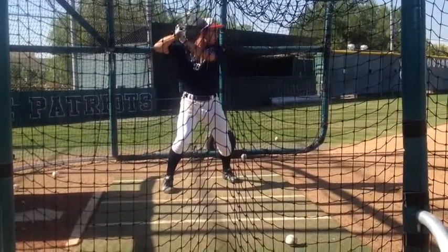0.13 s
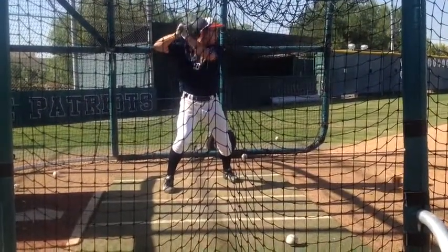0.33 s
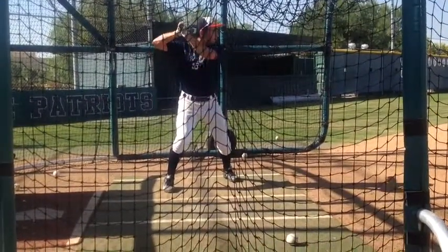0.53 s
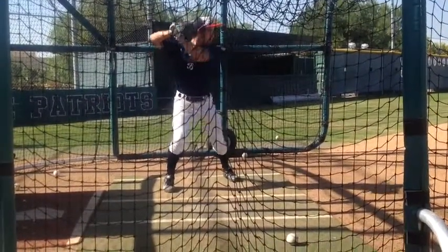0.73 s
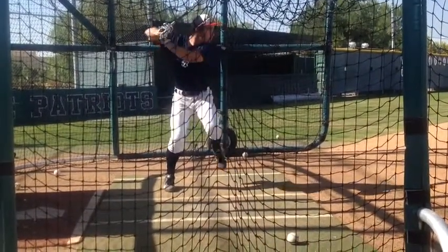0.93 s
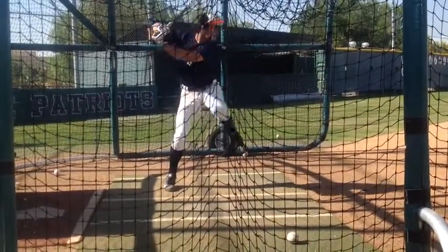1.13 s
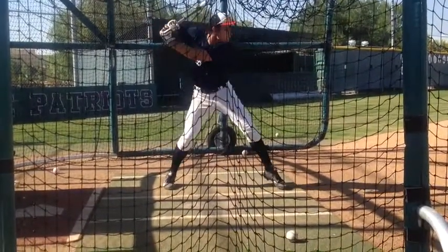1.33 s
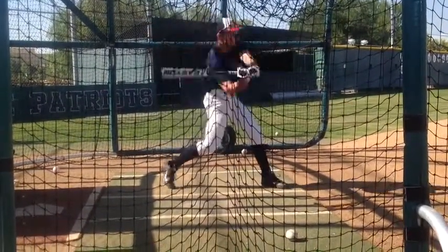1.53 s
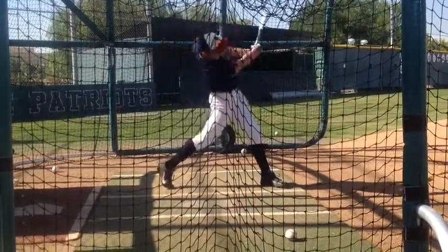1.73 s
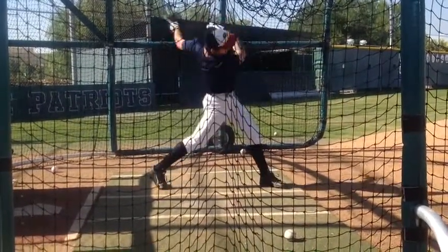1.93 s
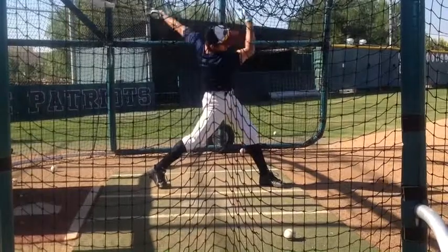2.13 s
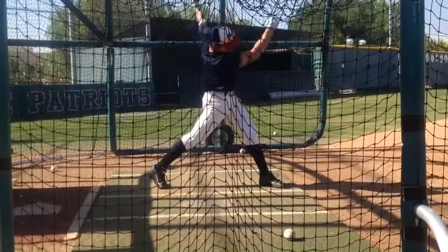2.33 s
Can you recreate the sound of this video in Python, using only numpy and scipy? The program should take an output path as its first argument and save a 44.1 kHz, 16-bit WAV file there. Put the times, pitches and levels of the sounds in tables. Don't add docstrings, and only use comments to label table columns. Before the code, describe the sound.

A metal baseball bat hits a ball with one hard, pinging crack, followed by quick slap echoes and a short ring, in an outdoor batting cage with a faint wavering motor hum; mono microphone nearby, slightly overloaded.

```python
import sys
import numpy as np
from scipy import signal
from scipy.io import wavfile
from scipy.ndimage import uniform_filter1d

SR = 44100
rng = np.random.default_rng(int(sys.argv[2]) if len(sys.argv) > 2 else 0)


def store_wav(level_fs):
    pcm = np.round(np.clip(np.atleast_2d(level_fs), -1, 1) * 32767)
    wavfile.write(sys.argv[1], SR, pcm.T.astype(np.int16))


def attenuation_scalar(level_db):
    decades = np.asarray(level_db, float) / 20
    return 10 ** decades


N = 104958
TIME = np.arange(N) / SR
CRACK_S = 1.6487


def evened(x):
    return x / np.sqrt(np.mean(x ** 2) + 1e-20)


def read(points, hz):
    f, value = np.transpose(points)
    return np.interp(np.log(hz + 1), np.log(f + 1), value)


def add(mix, s, sound):
    part = mix[round(s * SR):][:len(sound)]
    part += sound[:len(part)]


def slow(rate_hz, count):
    f = np.geomspace(rate_hz / 20, rate_hz, 16)
    t = np.linspace(0, N / SR, count)[:, None]
    waves = np.sin(2 * np.pi * (f * t + rng.random(16)))
    return evened((waves / np.sqrt(f)).sum(1))


def modes(table, t):
    return sum(attenuation_scalar(db - 60 * t / t60) * np.sin(2 * np.pi * hz * t) for hz, db, t60 in table)


def noise(field_db, size):
    hop = size / 4
    frames = N * 4 // size + 5
    hz = np.fft.rfftfreq(size, 1 / SR)[:, None]
    t = np.arange(frames)[None] * hop / SR
    real, imag = rng.standard_normal((frames, len(hz), 2)).T
    z = (real + 1j * imag) * attenuation_scalar(field_db(hz, t))
    z *= hz < 15500
    return signal.istft(z, nperseg=size, noverlap=size * 3 // 4)[1][:N]


def patches(shape, bins, frames):
    z = rng.standard_normal(shape[::-1]).T
    z = uniform_filter1d(z, bins, 0)
    return evened(uniform_filter1d(z, frames, 1))


def town():
    # f/Hz, level/dB per Hz
    wash = [(35, -80), (60, -36), (91, -21), (129, -23), (206, -3), (237, -10), (404, -17), (1180, -19),
            (15600, -48.5)]
    # f/Hz, width/Hz, level/dB
    rumble = [(170, 42, -62.5), (286, 41, -69.5)]

    def wash_db(hz, t):
        blotches = 0.9 * patches((len(hz), t.size), bins=8, frames=10)
        return read(wash, hz) + blotches + 0.4 * slow(3.0, count=t.size)

    out = attenuation_scalar(-49.5) * evened(noise(wash_db, size=1024))
    for f, width, db in rumble:
        def band_db(hz, t):
            return -6 * ((hz - f) / width) ** 2 + 2.5 * slow(20.0, count=t.size)
        out += attenuation_scalar(db) * evened(noise(band_db, size=1024))
    return out


def microphone_hiss():
    return attenuation_scalar(-70) * evened(noise(lambda hz, t: 0 * hz, size=1024))


def machine():
    hum_hz, drift, waver_db = 104.44, 0.005, 1.8
    # multiple of hum_hz, level/dB rms
    orders = [(1, -61), (2, -50), (3, -70.5), (6, -68), (9, -71.5), (11, -69), (14, -71.5), (16, -68),
              (18, -67), (23, -73)]
    # t/s, level/dB
    swell = [(0.0, -67), (0.03, -49.5), (0.64, -51), (0.71, -78), (0.81, -56), (0.86, -63), (0.89, -58),
             (1.01, -85), (1.09, -52), (1.37, -46), (1.97, -54.5), (1.99, -62.5), (2.35, -49), (2.38, -54)]
    turn = 2 * np.pi * np.cumsum(hum_hz * (1 + drift * slow(8.0, count=N))) / SR
    swell_db = np.interp(TIME, *np.transpose(swell))
    out = np.zeros(N)
    for k, db in orders:
        level_db = swell_db if k == 2 else db
        level_db = level_db + waver_db * slow(25.04, count=N) * (k > 1)
        out += np.sqrt(2) * attenuation_scalar(level_db) * np.sin(round(k) * turn + 2 * np.pi * rng.random())
    return out


def distant_return():
    level_db, t60_s, centre_hz = -44, 1.24, 2440
    age = TIME - CRACK_S
    tail = noise(lambda hz, t: -14 * abs(np.log2((hz + 1) / centre_hz)), size=256)
    return attenuation_scalar(level_db - 60 * age / t60_s) * (age > 0) * evened(tail)


def lead_in_hiss():
    level_db, rise_s, centre_hz = -52, 0.033, 3000
    hiss = noise(lambda hz, t: -5 * abs(np.log2((hz + 1) / centre_hz)), size=256)
    swell = np.exp(np.minimum(TIME - CRACK_S, 0) / rise_s)
    return attenuation_scalar(level_db) * swell * (TIME < CRACK_S) * evened(hiss)


def thuds():
    # t/s, level/dB, f/Hz, t60/s
    knocks = [
        (1.8515, -33, 820, .02),
        (1.853, -26, 390, .028),
        (1.859, -31, 290, .028),
        (1.855, -36, 160, .04),
        (1.69, -28, 370, .03),
        (1.648, -28, 175, .03),
    ]
    out, t = np.zeros(N), np.arange(3000) / SR
    rise = 1 - np.exp(-t / 0.0015)
    for s, db, hz, t60 in knocks:
        add(out, s, rise * modes([(hz, db, t60)], t))
    return out


def scatter():
    level_db, lump_db, flicker_db = -24, 1.0, 1.8
    end_s, end_db = 1.868, -5
    # f/Hz, level/dB per Hz
    spectrum = [(150, -44), (250, -32), (809, -1), (2200, -2.5), (2490, -4.5), (2800, -2), (3390, -7.5),
                (5690, -14), (15500, -30.5)]
    # f/Hz, t60/s
    decay = [(500, 0.27), (1000, 0.33), (2500, 0.83), (6000, 0.66), (14000, 0.61)]
    # t/s, level/dB over the plain decay
    returns = [(1.671, 1.5), (1.676, -8), (1.687, -3), (1.692, 4.5), (1.735, -4), (1.778, -1),
               (1.795, -5.5), (1.808, -0.5), (1.85, -4)]
    # f/Hz, width/Hz, level/dB
    barrel_tint = [(2190, 125, 7.5), (2940, 87, 1), (1470, 190, 2.5), (4400, 270, -0.5)]

    def field_db(hz, t):
        age = np.maximum(t - CRACK_S, 0)
        lumps = lump_db * patches((len(hz), t.size), bins=6, frames=3)
        lumps += flicker_db * np.clip(hz / 6000, 0, 1) * patches((1, t.size), bins=1, frames=2)
        step = end_db * np.clip((t - end_s) * 100, 0, 1)
        tint = sum(db * np.exp(-((hz - f) / width) ** 2) for f, width, db in barrel_tint)
        return read(spectrum, hz) + tint - 60 * age / read(decay, hz) + step + lumps

    x = noise(field_db, size=512)
    start = round(CRACK_S * SR)
    level = attenuation_scalar(level_db + np.interp(TIME, *np.transpose(returns))) * (TIME > CRACK_S)
    return level * x / np.std(x[start:start + 2000])


def near_scatter():
    level_db, t60_s, end_s = -16, 0.074, 1.673
    # f/Hz, level/dB per Hz
    spectrum = [(300, -42), (500, -26), (800, -1.5), (1500, -1.5), (2300, -6.5), (2900, -3), (4000, -15.5),
                (15500, -23.5)]
    age = np.maximum(TIME - CRACK_S, 0)
    level = attenuation_scalar(level_db - 60 * age / t60_s) * np.clip((end_s - TIME) * 300, 0, 1)
    return level * (TIME > CRACK_S) * evened(noise(lambda hz, t: read(spectrum, hz), size=256))


def barrel_ping(t):
    # f/Hz, level/dB, t60/s
    wall = [(2764, 3.5, 0.025), (3076, -9, 0.041), (4370, -6, .018), (5640, -15.5, 0.045),
            (3780, -7.5, 0.016), (1620, -6, 0.014)]
    return modes(wall, t) * (1 - np.exp(-t / 0.00097))


def direct_crack():
    # f/Hz, level/dB, t60/s
    contact = [(805, -12, .045), (1300, 1, .009), (1100, -12, .015), (3000, -5, .006), (3750, -9, .008),
               (7700, -6, .003), (10500, -20, .005), (14000, -15, .003)]
    out, t = np.zeros(N), np.arange(4000) / SR
    body = modes(contact[:3], t) * (1 - np.exp(-t / 0.00025))
    add(out, CRACK_S, body + attenuation_scalar(-16) * barrel_ping(t))
    add(out, CRACK_S + 0.0003, -modes(contact[3:], t))
    return out


def wall_slaps():
    # f/Hz, level/dB, t60/s
    snap_back = [(1530, -15.5, 0.018), (2050, -2.5, 0.0079), (3410, -8, 0.0054), (4080, -7.5, 0.0069),
                 (5860, -11.5, 0.0041), (9040, -18.5, 0.0071), (13000, -42, .003)]
    # t/s, snap level/dB, ping level/dB, dulling f/Hz
    slaps = [(1.6885, -7, -5, 11000), (1.7095, -4, -24, 13000), (1.6685, -16, -30, 2500),
             (1.7045, -17, -24, 3000), (1.7112, -14, -30, 6000), (1.7235, -20, -28, 5000),
             (1.7625, -32, -24, 4000), (1.772, -25, -38, 4000), (1.805, -30, -36, 6000),
             (1.856, -33, -40, 8000), (1.947, -40, -44, 3000), (2.21, -46, -48, 4000),
             (2.2299, -42, -48, 4000), (2.25, -46, -48, 3000)]
    out, t = np.zeros(N), np.arange(4000) / SR
    snap, ping = modes(snap_back, t), barrel_ping(t)
    for s, snap_db, ping_db, dull_hz in slaps:
        b, a = signal.butter(2, [1000, min(dull_hz, 14000)], "bandpass", fs=SR)
        add(out, s, signal.lfilter(b, a, attenuation_scalar(snap_db) * snap + attenuation_scalar(ping_db) * ping))
    return out


def barrel_ring():
    stop_s, stop_db, wobble_db = 1.782, -12, 1.8
    # f/Hz, level/dB, t60/s, rise/s
    ring = [(2245, -18.5, .38, .016), (2790, -26, .45, .01), (5600, -29, .2, .03)]
    out, t = np.zeros(N), np.maximum(TIME - CRACK_S, 0)
    damped_db = stop_db * np.clip((t + CRACK_S - stop_s) * 100, 0, 1)
    for hz, db, t60, rise in ring:
        level = attenuation_scalar(db - 60 * t / t60 + damped_db + wobble_db * slow(70.0, count=N))
        out += level * (1 - np.exp(-t / rise)) * np.sin(2 * np.pi * hz * t)
    return out


def bat():
    low_cut = signal.butter(2, 480, "highpass", fs=SR, output="sos")
    return signal.sosfilt(low_cut, direct_crack() + wall_slaps() + barrel_ring())


def scene():
    background = town() + microphone_hiss() + machine()
    surroundings = distant_return() + scatter() + near_scatter()
    return (background + surroundings + lead_in_hiss() + thuds() + bat())[None]


def top_cut(x):
    return signal.sosfilt(signal.butter(12, 16570, fs=SR, output="sos"), x)


def record(dry):
    low_cut = signal.butter(2, 70.0, "highpass", fs=SR, output="sos")
    overloaded = np.clip(signal.sosfilt(low_cut, dry), -1, 1)
    mix = signal.oaconvolve(overloaded, signal.firwin(255, 16300, fs=SR)[None], "same")
    return top_cut(mix)


dry = scene()
out = record(dry)
store_wav(out)
```